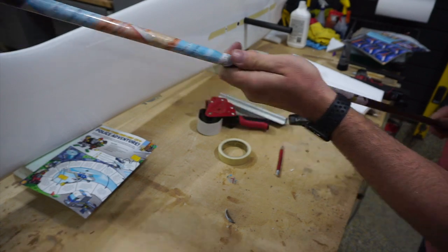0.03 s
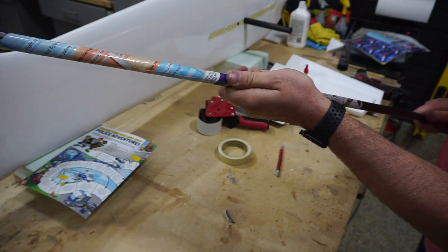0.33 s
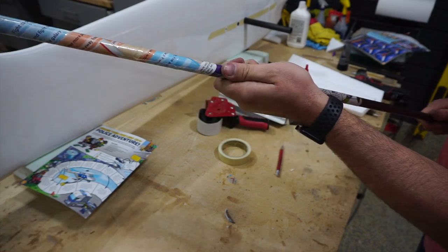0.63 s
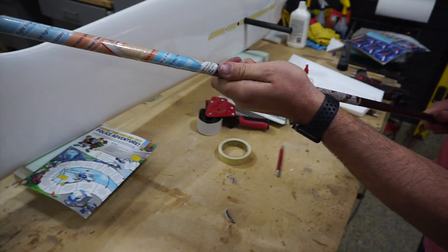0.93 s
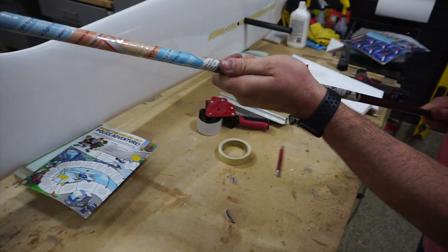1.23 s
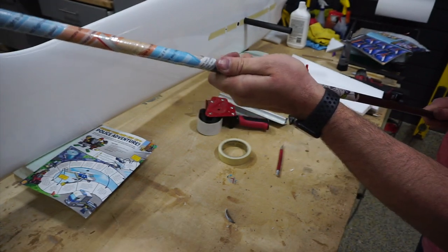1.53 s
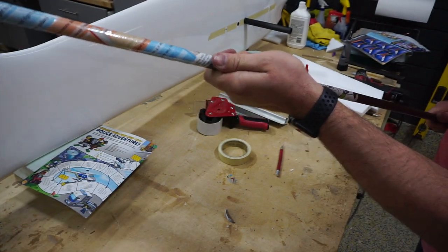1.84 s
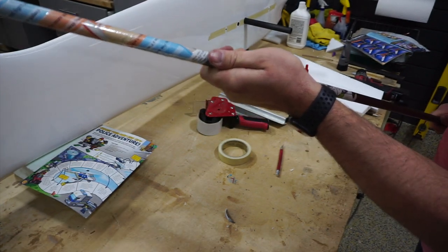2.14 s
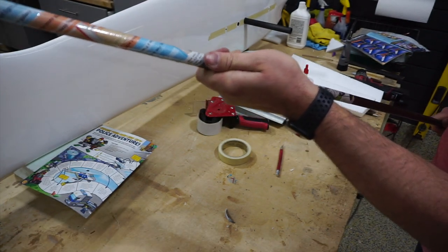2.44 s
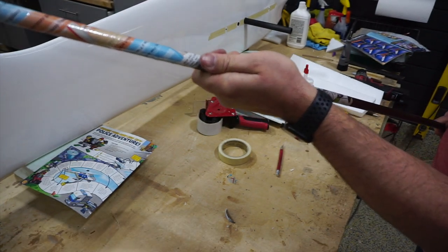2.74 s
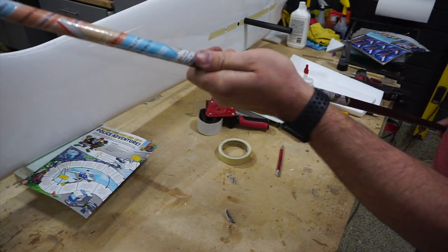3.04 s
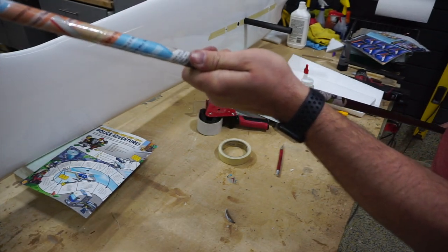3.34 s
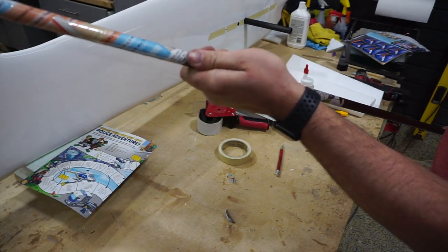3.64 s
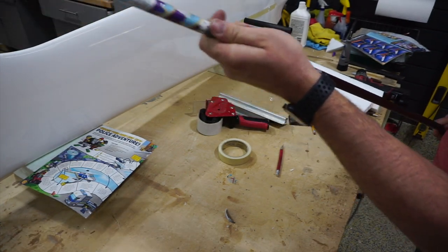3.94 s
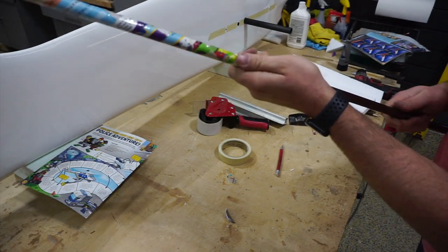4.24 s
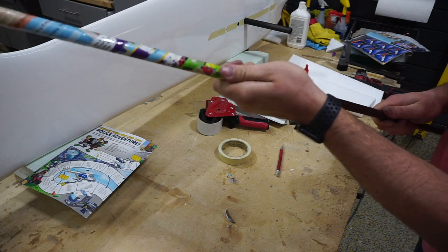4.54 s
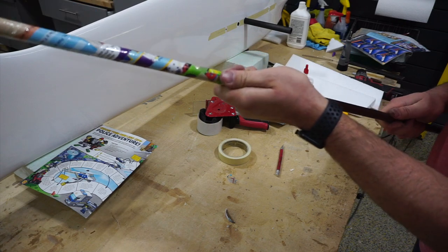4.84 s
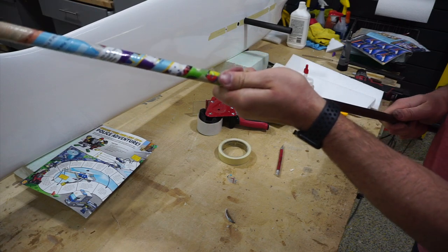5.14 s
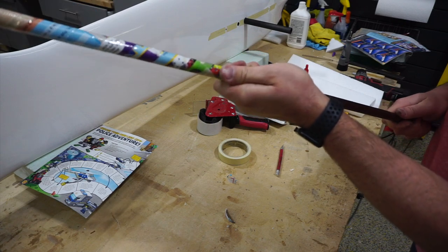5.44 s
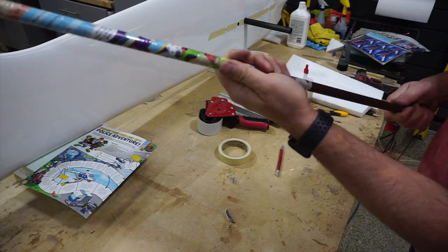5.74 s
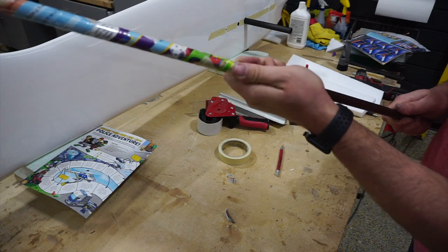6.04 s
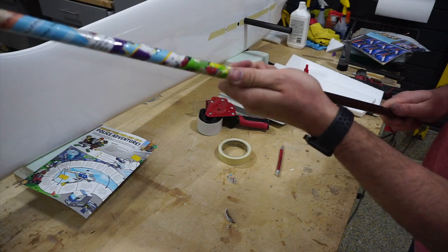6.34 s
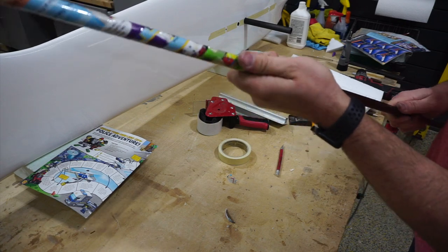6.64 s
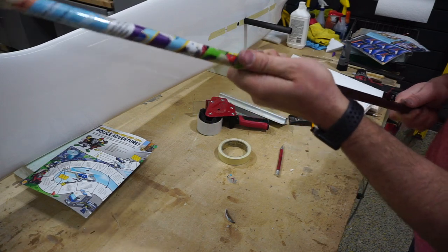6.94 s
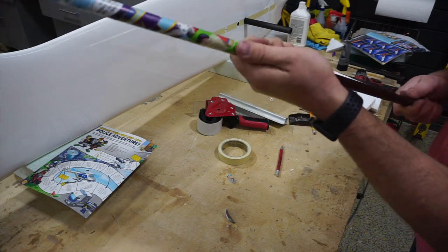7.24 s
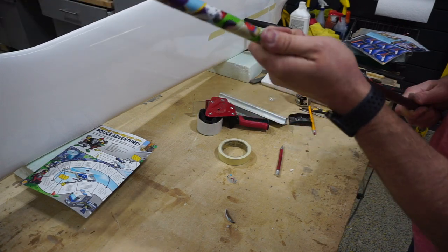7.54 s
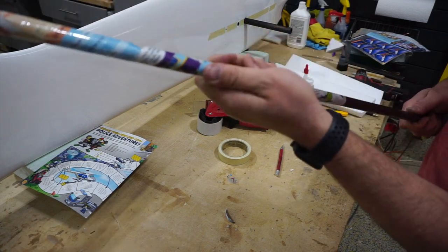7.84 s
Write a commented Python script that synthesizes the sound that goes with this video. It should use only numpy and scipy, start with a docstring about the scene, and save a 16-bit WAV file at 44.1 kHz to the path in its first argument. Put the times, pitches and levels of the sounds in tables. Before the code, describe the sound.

A tape-wrapped paper tube is shoved along a rod in short, hissing strokes, then drawn in one long pull while the rod's hollow ring falls in pitch. The loosened tube then scrapes and knocks lightly on the rod, the tape snaps, and a gripping hand brushes and squeaks on it. The sounds are close to a stereo microphone in a small, quiet workshop with a short echo.

```python
"""A tape-wrapped paper tube slides along a rod over a workbench, close to a stereo microphone.
The paper hisses as it rubs and makes the rod ring, lower and lower as the tube slides out.
Mostly in the second half, the loose tube scrapes and knocks on the rod and its tape snaps.
A hand grips the tube, brushes the tape and squeaks. A small, quiet workshop adds a short echo."""
import sys
import numpy as np
from scipy import signal
from scipy.fft import rfft, irfft, next_fast_len
from scipy.io import wavfile
from scipy.ndimage import map_coordinates

SR = 44100
rng = np.random.default_rng(int(sys.argv[2]) if len(sys.argv) > 2 else 0)


def generate_wav(signal):
    """Clip the signal to [-1, 1] and save it as 16-bit WAV at the path in sys.argv[1]."""
    frames = np.transpose(np.atleast_2d(signal))
    scaled = np.clip(frames, -1, 1) * 32767
    pcm = np.round(scaled).astype(np.int16)
    wavfile.write(sys.argv[1], SR, pcm)


N = 348390
TIME = np.arange(N) / SR

# The tone of each sound. Each row: frequency in Hz, relative level in dB.
AIR_TONE = [(15, -56), (25, -47), (107, -20), (152, -17), (362, -6), (480, -7), (619, -5), (862, -4),
            (1260, -5), (1360, -5.5), (1550, -6), (1950, -5.5), (4630, -7.5), (11000, -7.5), (14300, -63),
            (22000, -120)]
TAPE_TONE = [(200, -38), (1000, -36.5), (2500, -20), (4000, -15), (5000, -11), (7500, -8.5), (9000, -6.5),
             (10000, 0), (11500, -5)]
TUBE_TONE = [(80, -32), (200, -22), (350, -28.5), (470, -6.5), (700, -18.5), (1050, -6.5), (1250, -9),
             (1700, -2.5), (2300, 0.5), (2900, 1), (3300, -4), (3800, 0), (5000, -4), (7500, -5),
             (11000, -9)]
SNAP_TONE = [(100, -50), (400, -26), (1200, -16), (2200, -3.5), (3200, -4), (4800, 0.5), (6500, -5.5),
             (9000, -2.5), (11500, 2.5)]
PAPER_TONE = [(150, -43), (450, -22.5), (1000, -13), (2000, -9), (3500, -4), (5500, 0), (7500, 0.5),
              (10000, 2), (11500, -6)]
ROD_TONE = [(400, -33), (700, -9), (1100, -5), (1500, -8.5), (2000, -2.5), (3800, 3.5), (4800, 3.5),
            (6000, 1.5), (8000, -8), (11000, -18)]  # how well the rod passes its ringing to the air
# How alike the room's air sounds left and right. Each row: frequency in Hz, likeness from 0 to 1.
AIR_LIKENESS = [(50, 1), (200, 0.28), (500, 0), (2000, 0), (10000, 0)]
# The workshop's echo. Each row: frequency in Hz, seconds to fade by 60 dB.
ECHO_TIMES = [(200, 0.75), (2000, 0.42), (5000, 0.32), (11000, 0.17)]
# The grip shifts. Each row: peak time in seconds, half length in seconds, pitch in Hz, level in dB.
GRIPS = [(.36, 0.47, 510, -74.5), (3.255, 0.057, 211, -75.5), (4.353, 0.16, 477, -75.5),
         (5.68, 0.064, 610, -81), (7.06, 0.29, 525, -71.5), (7.346, 0.13, 468, -76)]
# The hand brushes the tape. Each row: peak time in seconds, half length in seconds, level in dB.
BRUSHES = [(.05, 0.077, -45), (3.96, 0.072, -44.5), (4.2, 0.24, -57.5), (5.76, 0.067, -58),
           (6.37, 0.054, -55), (7.04, .12, -60), (7.762, 0.043, -41.5)]
# Skin squeaks on tape. Each row: start in seconds, length in seconds, first and last pitch in Hz,
# level in dB, wobble as a share of the pitch.
SQUEAKS = [(0, 0.13, 2424, 2460, -60, 0.0096), (3.928, 0.13, 2990, 2950, -62, 0.02),
           (4.42, 0.17, 7000, 6900, -73, .006), (4.47, 0.094, 8640, 8800, -64, .004),
           (6.698, 0.12, 10530, 10900, -59, 0.0082), (6.849, 0.42, 6760, 6320, -66.5, 0.016),
           (7.697, 0.1, 2966, 2950, -43.5, 0.059)]
# The loose tube drags. Each row: peak time in seconds, half length in seconds, level in dB.
SCRAPES = [(4.42, .08, -59.5), (4.63, 0.059, -59.5), (5.58, 0.25, -69.5), (5.93, 0.037, -47.5),
           (6.12, 0.11, -60), (6.34, 0.071, -58.5), (6.588, 0.056, -47.5), (7.07, 0.26, -59.5),
           (7.228, 0.032, -47.5), (7.762, 0.058, -46.5), (7.885, 0.039, -55)]
# The rod knocks inside the tube. Each row: start in seconds, relative level in dB, ringing pitch in Hz,
# left side over right in dB.
KNOCKS = [(.385, -41.5, 2580, -2), (.431, -39.5, 2000, -4), (.463, -38, 2700, -4),
          (1.126, -41.5, 1980, -6.5), (1.153, -35, 2160, -1), (1.322, -39, 2020, 0),
          (2.788, -36.5, 2180, 0), (3.739, -41, 3150, 2), (4.42, -38, 2500, -8), (4.476, -38.5, 2330, -6),
          (4.566, -34, 2560, -4.5), (4.635, -32, 2320, -3), (4.7138, -31.5, 2440, 2.5),
          (5.054, -36.5, 2210, -3), (5.362, -36.5, 2820, -10), (5.386, -28, 2240, -1),
          (6.076, -31.5, 1880, -7), (6.166, -31.5, 2730, 0), (6.667, -31.5, 2960, 0),
          (6.716, -25, 2720, -2.5), (6.898, -41.5, 2470, -6), (7.306, -32, 2220, -4),
          (7.34, -28.5, 2240, -1), (7.478, -24.5, 2020, -6.5), (7.499, -26, 1930, 1)]
# The tape snaps. Each row: start in seconds, relative level in dB.
SNAPS = [(.217, -41.5), (0.289, -38), (.3094, -25.5), (1.1565, -26), (4.564, -29), (4.714, -23.5),
         (5.3955, -22.5), (5.9912, -23), (6.0269, -30.5), (6.087, -18.5), (6.1509, -21), (6.6764, -23),
         (6.898, -39.5), (7.314, -17), (7.394, -20), (7.799, -26.5)]
# The rod's modes, its ways of bending and ringing. Each row: pitch as a multiple of mode 4, level in dB.
ROD_MODES = [(.24, -2), (.45, -3), (.695, 1), (1.0, .5), (1.32, -2), (1.69, -1), (2.05, -1), (2.47, -8)]
# Mode 4 falls as tube and rod together grow longer. Each row: time in seconds, pitch in Hz.
FOURTH_MODE_PITCH = [(0.2, 6350), (.85, 4950), (1.35, 4620), (2, 3940), (2.5, 3290), (3, 2710), (3.3, 2480),
                     (3.65, 2330), (7.9, 2150)]
# The point of contact moves and favours some modes. Each row: time in seconds, favoured mode number,
# dB lost for each mode away from it (a negative loss is a gain).
CONTACT = [(.3, 1.3, 14.5), (.9, 1.3, 5), (1.4, 3, -2.5), (1.9, 3.7, 0), (3, 2.6, 1), (3.35, 4, -1),
           (3.6, 6.2, 1), (4.8, 5.3, 4), (6, 4.5, -0.5)]
# One long pull of the tube along the rod. Each row: time in seconds, relative level in dB.
LONG_PULL = [(1.33, -53.5), (1.54, -50.5), (1.57, -57), (1.7, -52.5), (2.01, -53.5), (2.21, -48.5),
             (2.3, -50.5), (2.83, -50), (2.86, -54), (2.99, -47), (3.45, -51.5), (3.6, -49)]
# Short shoves of the tube. Each row: start in seconds, length in seconds, relative level in dB.
SHOVES = [(0.197, .09, -59), (0.3, 0.11, -48.5), (0.477, 0.089, -49), (0.607, 0.056, -45.5),
          (0.698, 0.081, -51), (0.869, 0.051, -56), (1.153, 0.028, -52.5), (3.594, 0.038, -47.5),
          (3.735, 0.02, -56.5), (4.706, 0.016, -49), (4.77, .16, -56), (5.064, 0.13, -61.5)]

TUBE_LAG = 19.05  # the left microphone hears the loose tube this many samples before the right


def amp(db):
    """Turn decibels into a number to multiply by."""
    return 10 ** (np.asarray(db) / 20)


def unit(x):
    """Scale a sound to an average power of 1."""
    return x / np.sqrt(np.mean(x ** 2) + 1e-20)


def along(points, hz):
    """Read between the rows of a (Hz, value) table, on a log frequency scale."""
    row_hz, values = np.transpose(points)
    return np.interp(np.log(hz + 1), np.log(row_hz + 1), values)


def wobble(rate, size=N):
    """A smooth curve through `rate` random points a second."""
    points = rng.standard_normal(int(size * rate / SR) + 4)
    return map_coordinates(points, [np.arange(size) * rate / SR])


def filtered(x, response):
    """Multiply each frequency in x by response(hz)."""
    n = x.shape[-1]
    padded = next_fast_len(n + 8192)
    return irfft(rfft(x, padded) * response(np.fft.rfftfreq(padded, 1 / SR)), padded)[..., :n]


def coloured(x, tone):
    """Shape x with a tone table, at an average power of 1."""
    return unit(filtered(x, lambda hz: amp(along(tone, hz))))


def noise_band(shape, hz, width_hz, steepness=2):
    """Noise gathered around one pitch."""
    noise = rng.standard_normal(shape)
    return unit(filtered(noise, lambda f: 1 / (1 + ((f - hz) / width_hz) ** steepness)))


def fade(t, t60):
    """A fade that drops 60 dB in t60 seconds."""
    return np.exp(-np.log(1000) * t / max(t60, 1e-4))


def add(track, start, sound):
    """Lay a sound into a track, `start` seconds in."""
    part = track[..., max(round(start * SR), 0):][..., :sound.shape[-1]]
    part += sound[..., :part.shape[-1]]


def friction(grain_db, judder_db, judder_rate):
    """Countless tiny slips of uneven size, bunched by the judder of the hand."""
    return rng.standard_normal(N) * amp(grain_db * wobble(1500) + judder_db * wobble(judder_rate))


def swells(strokes):
    """Loudness of a series of strokes: each builds up more slowly than it stops."""
    gain = np.zeros(N)
    for peak, half_length, db in strokes:
        t = (TIME - peak) / half_length
        gain += amp(db) * np.exp(-np.abs(t / np.where(t < 0, 1.125, 0.74)) ** 1.71)
    return gain


def microphones(x, echo, pan_db, lag):
    """A sound plus its echo in stereo: the left is pan_db louder and hears x `lag` samples sooner."""
    direct = filtered(x, lambda hz: np.exp(1j * np.pi * hz / SR * lag * np.array([[1], [-1]])))
    return (direct + echo) * amp([[pan_db / 2], [-pan_db / 2]])


def hit_in_room(x, pan_db, lag, room_db, bench_db):
    """A short sound scatters quickly off the bench, then dies away in the room."""
    hz, t, noise = signal.stft(rng.standard_normal((2, SR // 3)), SR, nperseg=256)
    decay = np.exp(-np.log(1000) * t / along(ECHO_TIMES, hz)[:, None])
    tail = signal.istft(noise * decay, SR, nperseg=256)[1]
    t = np.arange(tail.shape[1]) / SR
    scatter = rng.standard_normal(tail.shape) * fade(t, 0.088) * (t > .0012)
    tail *= t > .005
    room = amp(room_db) * tail / np.linalg.norm(tail[0])
    bench = amp(bench_db) * scatter / np.linalg.norm(scatter[0])
    echo = signal.fftconvolve(x[None], room + bench, axes=1)[:, :len(x)]
    return microphones(x, echo, pan_db, lag)


def rub_in_room(x, pan_db, lag, room_db, t60):
    """A rubbing source keeps shifting, so its echo is a soft wash that follows its tone."""
    spectrum = signal.stft(x, SR, nperseg=512)[2]
    keep = fade(256 / SR, t60) ** 2  # share of the energy left after each step
    energy = signal.lfilter([1 - keep], [1, -keep], np.abs(spectrum) ** 2)
    noise = signal.stft(rng.standard_normal((2, N)), SR, nperseg=512)[2]
    wash = np.std(x) * unit(signal.istft(noise * np.sqrt(energy), SR, nperseg=512)[1][:, :N])
    return microphones(x, amp(room_db) * wash, pan_db, lag)


def rod_bending(x, width_hz, valley_db):
    """Pass x through the rod's modes, which fall in pitch as the tube slides out."""
    hz, t, spectrum = signal.stft(x, SR, nperseg=1024)
    fourth_hz = np.interp(t, *np.transpose(FOURTH_MODE_PITCH))
    times, *columns = np.transpose(CONTACT)
    favoured, loss_db = (np.interp(t, times, column) for column in columns)
    weights = amp([-loss_db * np.abs(i + 1 - favoured) for i in range(len(ROD_MODES))])
    weights /= np.sqrt(np.mean(weights ** 2, axis=0))  # the modes share the rubbing power
    modes = 0
    for (ratio, db), weight in zip(ROD_MODES, weights):
        centre = ratio * fourth_hz
        width = width_hz * np.sqrt(centre / 3000)  # higher modes are damped more
        modes += amp(db) * weight / (1 + ((hz[:, None] - centre) / width) ** 2)
    return signal.istft(spectrum * (modes + amp(valley_db)), SR, nperseg=1024)[1][:N]


def room_air():
    """Faint, steady air with a low, fuzzy hum."""
    def spread(hz):
        angle = np.arccos(np.clip(along(AIR_LIKENESS, hz), -1, 1)) / 2
        return np.array([np.cos(angle), np.sin(angle)])

    mid, side = filtered(coloured(rng.standard_normal((2, N)), AIR_TONE), spread)
    air = amp(-61) * unit(np.array([mid + side, mid - side]))
    low_hum = amp(-91) * noise_band((2, N), hz=171, width_hz=7.4)
    high_hum = amp(-84.5) * noise_band((2, N), hz=471, width_hz=35)
    return air + low_hum + high_hum


def gripping():
    """Soft skin stirs only the tube's low tones, giving a hollow rub."""
    out = np.zeros(N)
    for peak, half_length, hz, db in GRIPS:
        body = noise_band(N, hz, width_hz=0.24 * hz)
        out += amp(db) * body * np.exp(-((TIME - peak) / half_length) ** 2)
    return rub_in_room(out, pan_db=-0.5, lag=0, room_db=-2.5, t60=0.15)


def brushing():
    """The hand slips over the glossy tape with a thin, high hiss."""
    hiss = coloured(friction(grain_db=2.5, judder_db=2.1, judder_rate=66), TAPE_TONE)
    gain = swells(BRUSHES) + amp(-12.5) * swells(SCRAPES)  # scraping also rubs the tape
    return rub_in_room(gain * hiss, pan_db=-1.5, lag=0, room_db=3, t60=0.13)


def squeaking():
    """Skin sticks and slips fast enough to give short, unsteady whistles."""
    out = np.zeros(N)
    for start, length, first_hz, last_hz, db, waver in SQUEAKS:
        n = int(length * SR)
        pitch = np.linspace(first_hz, last_hz, n) * (1 + waver * wobble(696, size=n))
        whistle = np.sin(2 * np.pi * np.cumsum(pitch) / SR)
        add(out, start, amp(db) * np.hanning(n) ** .5 * whistle)
    return rub_in_room(out, pan_db=1.5, lag=0, room_db=-4.5, t60=0.17)


def scraping():
    """The loose tube drags on the rod in coarse slips that sound its hollow body."""
    slips = friction(grain_db=5.5, judder_db=1.5, judder_rate=80)
    rasp = coloured(rod_bending(slips, width_hz=110, valley_db=6), TUBE_TONE)
    gain = swells(SCRAPES) + amp(-25) * swells(BRUSHES)  # brushing also stirs the rod
    return rub_in_room(gain * rasp, pan_db=-3, lag=TUBE_LAG, room_db=3, t60=0.2)


def knocking():
    """Each knock is a brief chatter in the tube, then a cluster of close rod modes rings on."""
    out, t = np.zeros((2, N)), np.arange(SR // 3) / SR
    bass_cut = signal.butter(2, 420, "high", fs=SR, output="sos")  # too light to thud
    attack = (1 - fade(t, 0.007)) ** 2
    for start, db, ring_hz, pan_db in KNOCKS:
        crackle_db = -6.5 + 0.09 * (db + 33)  # harder knocks crackle more
        ring_db = -16 - 5 * np.log2(ring_hz / 2300)  # lower modes ring more strongly
        body = coloured(rng.standard_normal(len(t)), TUBE_TONE)
        crackle = amp(crackle_db) * coloured(rng.standard_normal(len(t)), PAPER_TONE)
        chatter = (body + crackle) * fade(t, 0.023)
        ring = amp(ring_db) * noise_band(len(t), ring_hz, width_hz=380, steepness=4) * fade(t, 0.082)
        knock = signal.sosfilt(bass_cut, amp(db + 1.5) * (chatter + ring) * attack)
        add(out, start, hit_in_room(knock, pan_db, lag=TUBE_LAG, room_db=-7, bench_db=-5))
    return out


def snapping():
    """The tight tape lets go in one sharp crack, trailed by a tiny crinkle."""
    out, t = np.zeros((2, N)), np.arange(SR // 3) / SR
    for start, db in SNAPS:
        click = t == 0
        crinkle = amp(-12) * rng.standard_normal(len(t)) * fade(t, .0045)
        crack = coloured(np.roll(click + crinkle, 20), SNAP_TONE)
        crack *= amp(db + 14.5) / np.linalg.norm(crack)
        add(out, start, hit_in_room(crack, pan_db=-2.5, lag=0, room_db=-5, bench_db=-5))
    return out


def push(start, length, attack_s=0.0039, release_s=0.031):
    """Loudness of one slide: the paper breaks loose quickly, keeps moving, then coasts to rest."""
    t = np.maximum(TIME - start, 0)
    return (1 - np.exp(-t / attack_s)) * np.exp(-np.maximum(t - length, 0) / release_s)


def sliding_gain():
    """Loudness of paper on rod: the long pull and the short shoves add up in power."""
    times, pull_db = np.transpose(LONG_PULL)
    pull = amp(np.interp(TIME, times, pull_db) - 1) * push(times[0], times[-1] - times[0])
    power = pull ** 2
    for start, length, db in SHOVES:
        sag_db = 20 * np.maximum(TIME - start, 0)  # a shove tires by 20 dB a second
        power += (amp(db - sag_db) * push(start, length)) ** 2
    return np.sqrt(power)


def sliding():
    """Paper rubs along the rod: a bright hiss, and the rod's hollow, falling ring."""
    slips = friction(grain_db=1, judder_db=1.5, judder_rate=70)
    ring = coloured(rod_bending(slips, width_hz=140, valley_db=-35), ROD_TONE)
    hiss = coloured(friction(grain_db=1.5, judder_db=1.23, judder_rate=36), PAPER_TONE)
    rub = sliding_gain() * (hiss + amp(-3) * ring)
    return rub_in_room(rub, pan_db=2.5, lag=3.66, room_db=1.5, t60=0.28)


def scene():
    """The tube, the hand and the room, heard together."""
    rubs = sliding() + brushing() + scraping() + squeaking()
    return rubs + knocking() + snapping() + gripping() + room_air()


def record(dry):
    """Cut away the treble above about 11 kHz."""
    return filtered(dry, lambda hz: 1 / np.sqrt(1 + (hz / 11080) ** 220))


dry = scene()
out = record(dry)
generate_wav(out)
```